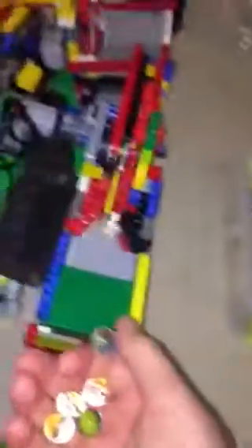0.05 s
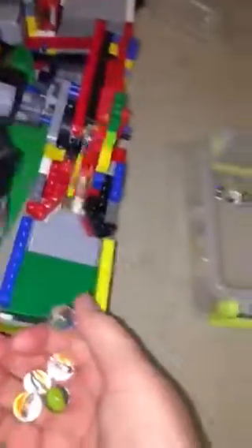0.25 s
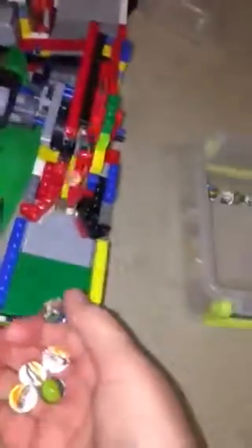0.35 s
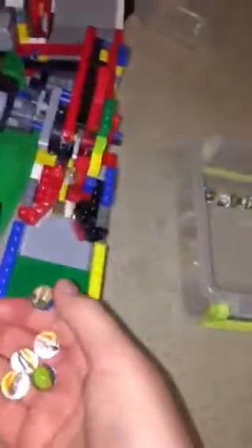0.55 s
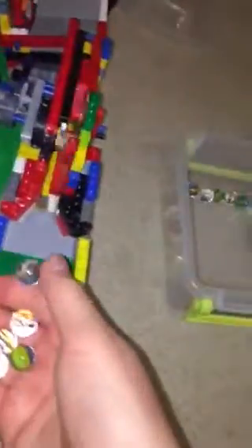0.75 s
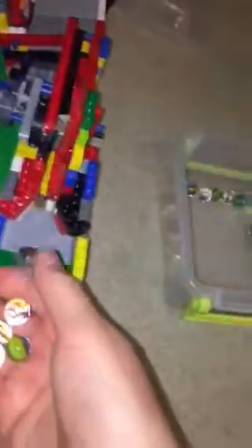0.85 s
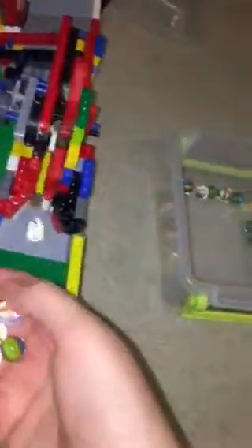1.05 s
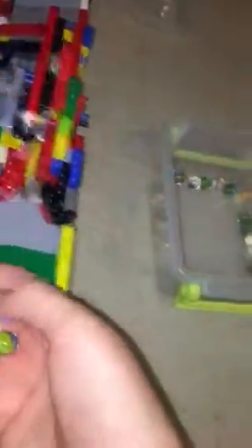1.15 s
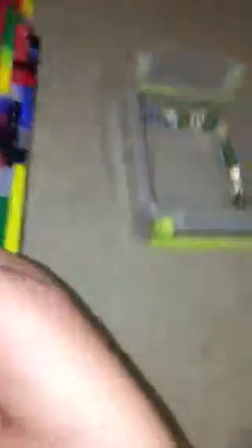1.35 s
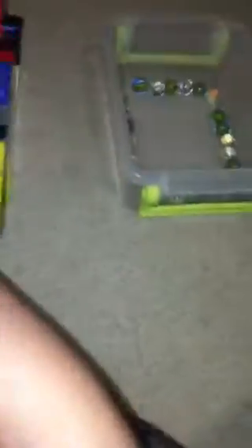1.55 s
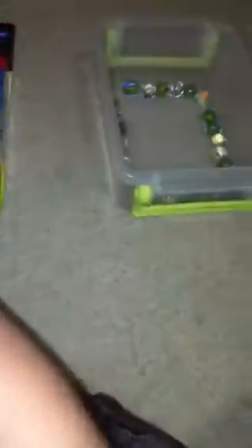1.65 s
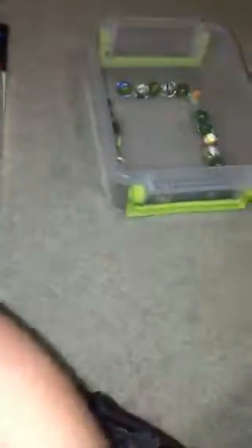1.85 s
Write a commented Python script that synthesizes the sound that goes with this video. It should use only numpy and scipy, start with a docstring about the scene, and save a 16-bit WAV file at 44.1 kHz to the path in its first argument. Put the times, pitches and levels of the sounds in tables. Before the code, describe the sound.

Glass marbles click through a plastic brick run, close by in a room. A faint rolling rattle starts around 0.2 seconds, with quick ticks from 0.3 to 0.7 and one loud, sharp smack at 0.5. Two hollow knocks come near 1.1 seconds, then more uneven ticks from 1.3 to 1.7 as the rolling fades. Soft bumps fall at 0.8 and 1.5, over steady hiss and faint hum.

```python
"""A room, with a small microphone close to a marble run of plastic bricks, fed by hand with glass marbles.
The marbles tick from brick to brick, each blow ringing the plastic; they rattle faintly as they roll and
knock twice on a hollow part. One sharp smack overloads the input. The hand and the base bump softly.
Behind them lie a steady hiss and hum; the gain control ducks everything after the loudest hits."""
import sys
import numpy as np
from scipy import signal
from scipy.fft import rfft, irfft
from scipy.io import wavfile
from scipy.ndimage import uniform_filter1d

SR = 44100
rng = np.random.default_rng(int(sys.argv[2]) if len(sys.argv) > 2 else 0)


def persist_wave(psi):
    """Save psi, clipped to +-1, as 16-bit WAV."""
    counts = np.round(np.clip(psi, -1, 1) * 32767).astype(np.int16)
    wavfile.write(sys.argv[1], SR, np.atleast_2d(counts).T)


N = 83790
TIME = np.arange(N) / SR

# Edges in Hz of five bands: low, low mid, mid, high mid, treble. The low band also takes all below it.
BAND_EDGES_HZ = [250, 1350, 2200, 3100, 5000, 16000]
# Marble on brick. Each row: start in seconds, ring time (t60) in seconds, the brick's two notes in Hz,
# then the relative level of each of the five bands in dB.
BRICK_TICKS = [(0.3483,0.03,3700,1237,-36,-33.5,-30,-27,-36.5), (.404,.027,3580,1900,-41,-38,-40,-37,-43),
               (.41,.018,3300,1520,-50,-35,-39,-31,-40.5), (0.4348,0.022,3500,1315,-36.5,-40,-36.5,-36,-49),
               (0.4593,.028,1640,3380,-47,-31.5,-34,-34,-44), (0.4933,.032,2070,4620,-40,-32,-32,-32,-35),
               (.502,.02,4230,2400,-34,-36.5,-35,-31,-30.5), (0.5064,.05,1970,1320,-33,-29.5,-35,-33.5,-37),
               (0.5192,0.017,1600,4200,-40.5,-35,-40,-40.5,-44),
               (0.531,.013,1330,1630,-38,-33.5,-50,-41,-41), (0.5795,.013,1710,4280,-42,-35,-42,-45,-38),
               (0.6234,0.019,1954,4290,-34,-26,-30.5,-26.5,-33.5),
               (0.659,.018,1970,4300,-41,-31.5,-38,-35,-42), (.669,0.027,1350,1890,-33,-33,-41,-41,-45),
               (.9134,0.063,2585,2940,-43,-42,-37,-44,-41), (1.0903,0.049,1090,2830,-38,-43,-38,-41,-43),
               (1.3434,0.024,3720,2570,-35,-31.5,-27,-24.5,-35.5),
               (1.395,0.041,1490,2590,-38,-26.5,-29.5,-33.5,-38),
               (1.4168,.03,3750,2790,-42,-37,-32.5,-31.5,-41),
               (1.4514,0.027,3700,2750,-44,-37.5,-35,-33,-43), (1.4866,.035,1700,3710,-53,-40,-39,-37,-46),
               (1.5192,0.041,2680,1500,-43,-26.5,-25,-28.5,-35.5),
               (1.5757,.042,1690,2690,-43,-24.5,-25,-39,-38),
               (1.6263,0.028,2550,1850,-46,-30,-25.5,-39,-35.5),
               (1.7029,.024,2570,1850,-41,-32,-27.5,-40,-39),
               (1.708,0.021,1850,3190,-35.5,-30.5,-38,-37.5,-37), (1.743,.04,1754,2595,-43,-34,-35,-36,-43)]
# Marble dropping on the hollow part, the first time with a quick bounce. Each row: as for the ticks.
HOLLOW_KNOCKS = [(1.0666,0.033,1067,5760,-23,-30,-27,-23,-24), (1.0707,0.027,5780,8100,-30,-32,-36,-31,-29),
                 (1.1415,0.032,3630,1960,-28.5,-23,-24,-20,-30.5)]
# Modes of the track and of the hollow part. Each row: pitch in Hz, relative level in dB, ring time as a
# multiple of the blow's t60.
TRACK_MODES = [(1230, -3, 1.1), (1505, -5.5, 1.1), (1684, -3, 1.2), (1954, -1, 1), (2605, -5, 1.1),
               (3196, -3.5, .8), (4290, -3, .9)]
HOLLOW_MODES = [(377.5, -9, 1.6), (666, -7.5, .7), (980, -7.5, 1), (1130, -1.5, 1.2), (1536, -9, .8),
                (2770, -10, 1), (3470, 8, .8), (3610, -2, 1.2)]
# Dense fine ringing of the same two parts. Each row: frequency in Hz, relative level in dB.
TRACK_CRACK_COLOUR = [(250, -13), (750, -9.5), (1250, 5), (4400, 0.5), (5200, -4.5), (8000, -6.5),
                      (10500, -12), (15000, -11.5)]
HOLLOW_CRACK_COLOUR = [(200, -13), (600, -3), (3700, 1), (4400, -4), (8000, -3.5), (10500, -12),
                       (15000, -11.5)]
# Modes struck by the smack. Each row: pitch in Hz, relative level in dB, t60 in seconds.
SMACK_MODES = [(1255, -26, 0.014), (1926, -29, 0.0092), (2710, -13.5, 0.011), (4220, -16, 0.019),
               (5400, -19, 0.014)]
# Rise and fall of the rolling rattle. Each row: time in seconds, level in dB.
ROLL_LEVELS = [(0, -50), (.15, -47.5), (.27, -37.5), (.45, -40.5), (.6, -40), (.8, -38.5), (.95, -40),
               (1.05, -41.5), (1.25, -38), (1.42, -37), (1.68, -37), (1.9, -56)]
# Spectrum of the rattle. Each row: frequency in Hz, relative level in dB.
ROLL_SPECTRUM = [(40, -50), (250, -7), (700, -12), (1200, 2.5), (2000, 3), (3000, -2.5), (4000, 0),
                 (5000, -7.5), (15000, -13.5)]
# Bumps of the hand and the track's base. Each row: start in seconds, level in dB, length in seconds.
HAND_BUMPS = [(.774, -47.5, .038), (1.512, -50, .034)]
# Spectrum of the room's hiss. Each row: frequency in Hz, relative level in dB.
HISS_COLOUR = [(25, -29), (60, -22), (130, -10.5), (300, -6), (385, -7), (460, -13), (700, -2.5),
               (800, -11), (1000, -1), (1280, 3), (1500, -4.5), (2050, 3), (2300, -2.5), (2650, -2.5),
               (3350, -7.5), (4200, 0), (4900, -9.5), (6500, -6.5), (9500, -11), (10500, -17), (12000, -9),
               (15500, -14)]
# Tones of the hum. Each row: pitch in Hz, level in dB, pitch wander in Hz.
HUM_TONES = [(119.6, -60.5, 2.8), (367, -61, 6.1), (395, -59.5, 6.53)]
# The room's decay, then its level. Each row: frequency in Hz, t60 in seconds.
ROOM_DECAY, ROOM_DB = [(250, 0.26), (2000, 0.27), (12000, 0.19)], -15

TICK_DB, KNOCK_DB, HISS_DB = 2, 1.5, -36
NOTE_DB, SECOND_NOTE_DB, NOTE_RING = 7.5, -1.5, 1.1  # the notes ring NOTE_RING times the blow's t60
FIRM_DB, NOTE_SINK, ATTACK_GROWTH = -25.5, .8, 1.2  # a firm blow; the others in dB per dB below it
SMACK_S, SMACK_DB = .4812, 6
FLEX_START_HZ, FLEX_END_HZ, FLEX_FALL_S, FLEX_S = 3356, 1146, 0.000495, 0.00186
FLEX_DB, FLEX_PUSH = 2, .14  # the push is a one-sided shove, as a share of the swings
THRESHOLD_DB, MAX_DUCK_DB, RECOVER_DB_PER_S = -10.5, 3.5, 14
CLIP_LEVEL, TREBLE_EDGE_HZ = .66, 15820


def ticks():
    """Glass on brick, close up; light contacts only scrape, with weaker notes and a slower attack."""
    out = np.zeros(N)
    for start, t60, first_hz, second_hz, *bands_db in BRICK_TICKS:
        light_db = max(FIRM_DB - max(bands_db), 0)
        tick = strike(TRACK_MODES, TRACK_CRACK_COLOUR, t60, (first_hz, second_hz), bands_db,
                      note_db=NOTE_DB - NOTE_SINK * light_db,
                      attack_s=.0006 * amp(ATTACK_GROWTH * light_db),
                      crack_share=.8, detune=0.0085, low_cut_hz=760)
        add(out, start, amp(TICK_DB) * tick)
    return out


def knocks():
    """A marble drops on the hollow part, whose lower modes give a fuller sound."""
    out = np.zeros(N)
    for start, t60, first_hz, second_hz, *bands_db in HOLLOW_KNOCKS:
        knock = strike(HOLLOW_MODES, HOLLOW_CRACK_COLOUR, t60, (first_hz, second_hz), bands_db,
                       note_db=5, attack_s=0.00025, crack_share=1.05, detune=0.0045, low_cut_hz=320)
        add(out, start, amp(KNOCK_DB) * knock)
    return out


def strike(modes, crack_colour, t60, notes_hz, bands_db,
           note_db, attack_s, crack_share, detune, low_cut_hz):
    """One blow rings the part's modes, two notes of the struck spot and a crack of dense ringing."""
    t = np.arange(SR // 8) / SR
    ring = np.zeros(len(t))
    for hz, db, share in modes:
        offset, polarity = rng.standard_normal(2)
        tone = np.sin(2 * np.pi * hz * (1 + detune * offset) * t)
        ring += np.sign(polarity) * amp(db - 60 * t / (t60 * share)) * tone
    first, second = np.cos(2 * np.pi * np.outer(notes_hz, t))
    notes = amp(note_db - 60 * t / (t60 * NOTE_RING)) * (first + amp(SECOND_NOTE_DB) * second)
    crack = colour(rng.standard_normal(len(t)), crack_colour) * amp(4.5 - 60 * t / (t60 * crack_share))
    hit = (ring + notes + crack) * np.minimum(t / attack_s, 1)
    low_cut = signal.butter(3, low_cut_hz, "high", fs=SR, output="sos")  # small parts give no bass
    return struck_spot(signal.sosfilt(low_cut, hit), bands_db)


def struck_spot(hit, bands_db):
    """The spot that is struck decides how strongly each band rings."""
    size, span = 8192, .01 * SR  # a band's level is its energy spread over 10 ms
    hz, spectrum = np.fft.rfftfreq(size, 1 / SR), rfft(hit, size)
    band = np.digitize(hz, BAND_EDGES_HZ[1:-1])
    power = np.bincount(band, abs(spectrum) ** 2 * (hz < BAND_EDGES_HZ[-1])) * 2 / size / span
    gain_db = np.array(bands_db) - 10 * np.log10(power)
    log_gain = np.log(amp(uniform_filter1d(gain_db[band], size=41)))
    # Minimum phase, so nothing sounds ahead of the blow.
    response = np.exp(np.conj(signal.hilbert(np.r_[log_gain, log_gain[-2:0:-1]])))
    return irfft(spectrum * response[:len(spectrum)])


def smack():
    """A very hard hit: the part flexes, falling in pitch as it gives way, then rings briefly."""
    t, out = np.arange(SR // 8) / SR, np.zeros(N)
    flex_hz = FLEX_END_HZ + (FLEX_START_HZ - FLEX_END_HZ) * np.exp(-t / FLEX_FALL_S)
    swings = FLEX_PUSH + np.sin(2 * np.pi * np.cumsum(flex_hz) / SR)
    flex = amp(FLEX_DB) * np.sin(np.pi * np.minimum(t / FLEX_S, 1) ** 0.77) ** 2 * swings
    ring = sum(amp(db - 60 * t / t60) * np.sin(2 * np.pi * hz * t) for hz, db, t60 in SMACK_MODES)
    crack = colour(rng.standard_normal(len(t)), TRACK_CRACK_COLOUR) * amp(-24 - 60 * t / 0.061)
    attack = np.minimum(2 * t / FLEX_S, 1)
    add(out, SMACK_S, amp(SMACK_DB) * (flex + (ring + crack) * attack))
    return out


def rolling(contacts_per_s=900):
    """Rolling marbles meet studs and seams in many tiny contacts."""
    touches = rng.random(N) < contacts_per_s / SR
    strength = amp(3.0 * np.minimum(rng.exponential(1, N), 3))
    contacts = touches * strength * rng.choice([-1, 1], N)
    t = np.arange(SR // 40) / SR
    grain = rng.standard_normal(len(t)) * amp(-60 * t / 0.022)
    rattle = signal.oaconvolve(contacts, grain)[:N]
    return colour(rattle, ROLL_SPECTRUM) * amp(np.interp(TIME, *np.transpose(ROLL_LEVELS)))


def hand():
    """The hand and the track's base give soft, dull bumps around 150 Hz."""
    out = np.zeros(N)
    for start, db, length in HAND_BUMPS:
        noise = rng.standard_normal(SR // 4)
        thud = colour(noise, [(30, -18), (150, 15), (380, -13), (800, -40), (3000, -60)])
        window = np.hanning(round(length * SR))
        add(out, start, amp(db) * window * thud[:len(window)])
    return out


def room(x):
    """The room returns a short diffuse tail to the microphone; its treble dies first."""
    echoes = rng.standard_normal(SR // 2) * (rng.random(SR // 2) < 3000 / SR)
    echoes[:round(.006 * SR)] = 0
    echoes = signal.sosfilt(signal.butter(2, 200, "high", fs=SR, output="sos"), echoes)
    hz, t, spectra = signal.stft(echoes, SR, nperseg=256)
    tail = signal.istft(spectra * amp(-60 * t / at_hz(ROOM_DECAY, hz)[:, None]), SR)[1]
    return amp(ROOM_DB) * signal.fftconvolve(x, tail / np.linalg.norm(tail))[:N]


def hiss():
    """Room hiss behind the run, its level flickering slightly."""
    return colour(rng.standard_normal(N), HISS_COLOUR) * amp(HISS_DB + 0.84 * drift(10.3))


def hum():
    """Faint low tones in the background, wavering in level and pitch."""
    out = np.zeros(N)
    for hz, db, wander_hz in HUM_TONES:
        peak = amp(db + 1.3 * drift(8.2)) * np.sqrt(2)
        pitch_hz = hz + wander_hz * drift(24.8)
        out += peak * np.sin(2 * np.pi * np.cumsum(pitch_hz) / SR)
    return out


def amp(db):
    """Decibels to gain."""
    return 10 ** (np.asarray(db) / 20)


def unit(x):
    """Scales to rms 1."""
    return x / np.sqrt(np.mean(x ** 2) + 1e-20)


def at_hz(points, hz):
    """Reads a table along a log-frequency axis."""
    points_hz, values = np.transpose(points)
    return np.interp(np.log(hz + 1), np.log(points_hz), values)


def add(mix, start, sound):
    """Mixes a sound in at a start in seconds."""
    part = mix[round(start * SR):][:len(sound)]
    part += sound[:len(part)]


def colour(x, points):
    """Shapes the spectrum of x, at rms 1."""
    gain = amp(at_hz(points, np.fft.rfftfreq(len(x), 1 / SR)))
    return unit(irfft(rfft(x) * gain, len(x)))


def drift(rate_hz):
    """Slow random wander of rms 1."""
    hz = np.fft.rfftfreq(N, 1 / SR)
    return unit(irfft(rfft(rng.standard_normal(N)) * np.exp(-(hz / rate_hz) ** 2) * (hz > 0), N))


def scene():
    """Everything reaches one close microphone, the same in both channels."""
    hits = ticks() + knocks() + smack()
    mono = hits + room(hits) + rolling() + hand() + hiss() + hum()
    return np.array([mono, mono])


def record(dry):
    """The gain control ducks after loud peaks, the input clips, and the top treble is cut steeply."""
    peak_db = 20 * np.log10(abs(dry).max(0) + 1e-9)
    over_db = np.clip(peak_db - THRESHOLD_DB, 0, MAX_DUCK_DB)
    recovery_db = TIME * RECOVER_DB_PER_S
    held_db = np.maximum.accumulate(over_db + recovery_db) - recovery_db
    lag = np.exp(-1 / (0.021 * SR))  # 21 ms: too slow to catch the smack
    duck_db = signal.lfilter([1 - lag], [1, -lag], held_db)
    clipped = np.clip(dry * amp(-duck_db), -CLIP_LEVEL, CLIP_LEVEL)
    low_pass = signal.firwin(401, TREBLE_EDGE_HZ, window=("kaiser", 8), fs=SR)
    return signal.oaconvolve(clipped, low_pass[None], "same")


dry = scene()
out = record(dry)
persist_wave(out)
```